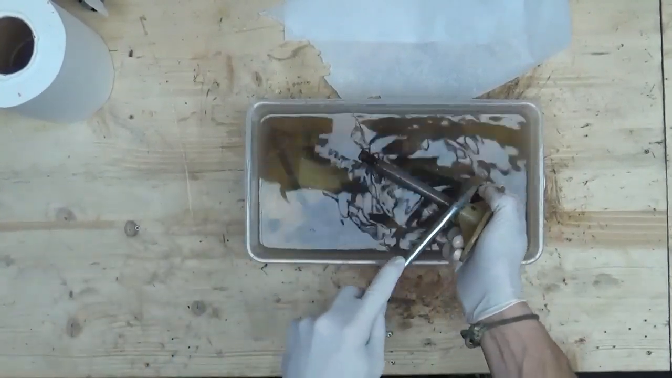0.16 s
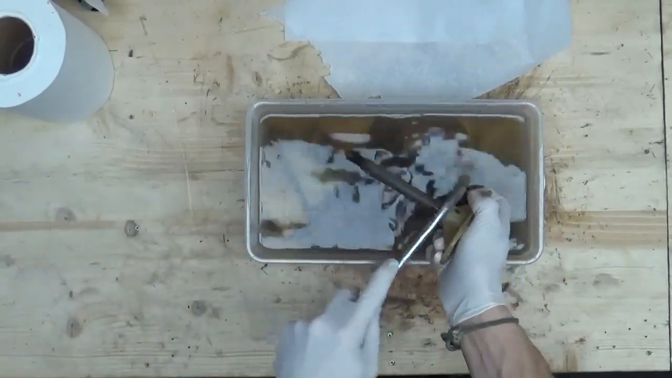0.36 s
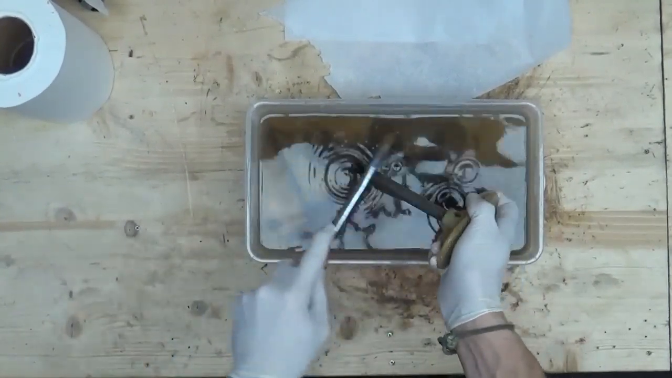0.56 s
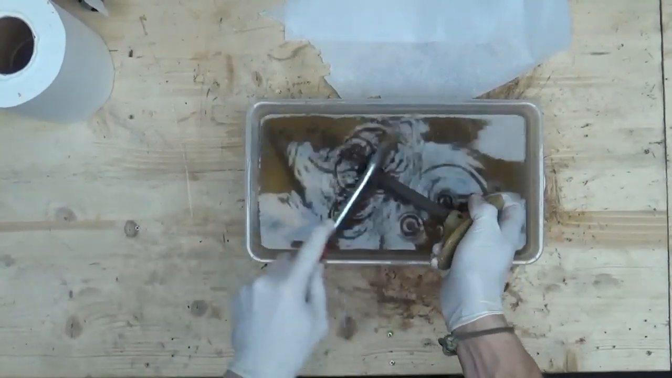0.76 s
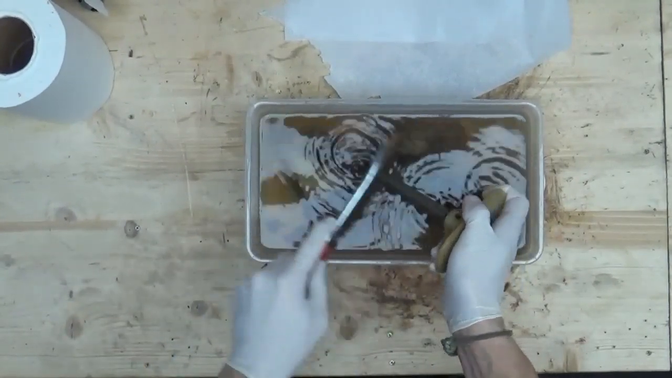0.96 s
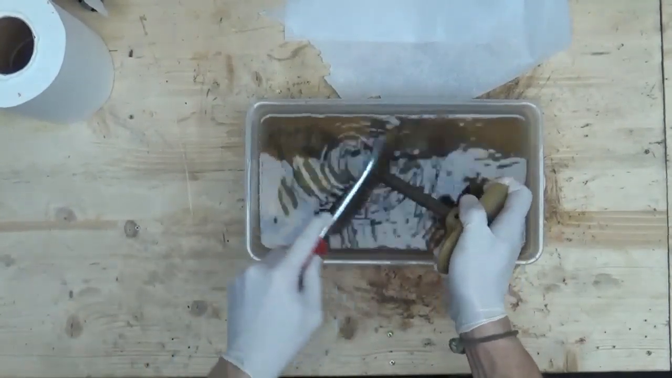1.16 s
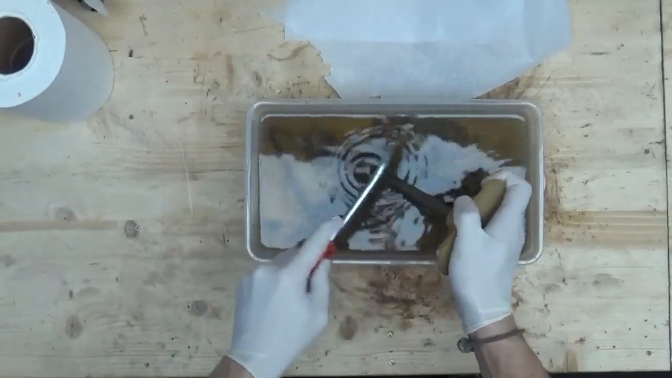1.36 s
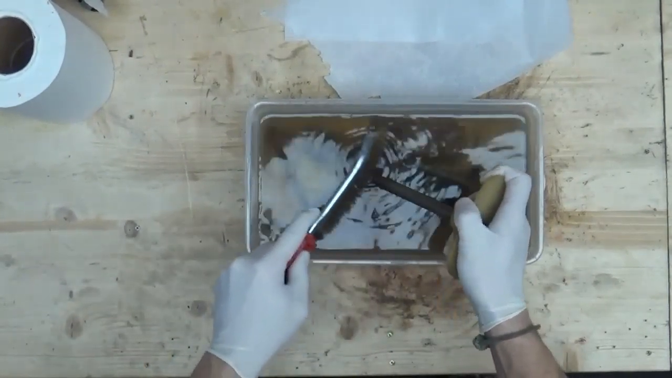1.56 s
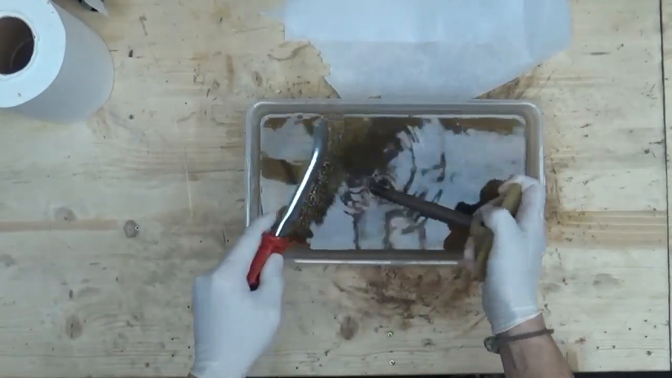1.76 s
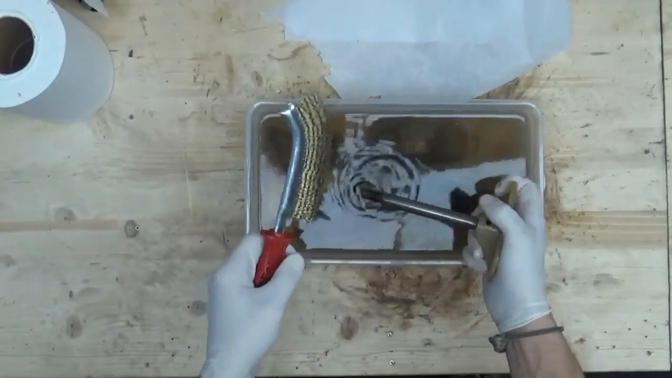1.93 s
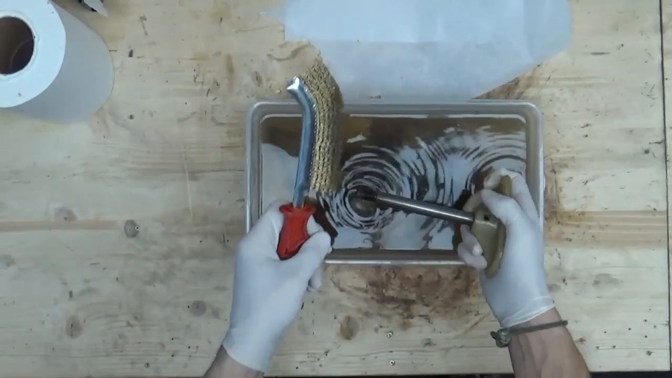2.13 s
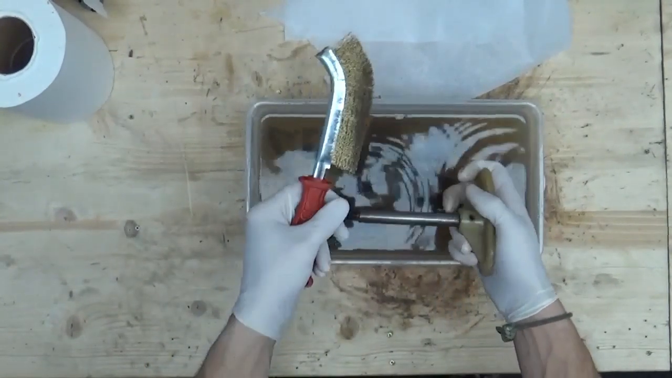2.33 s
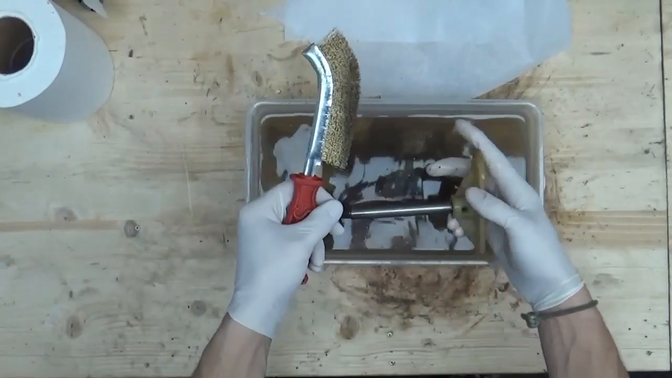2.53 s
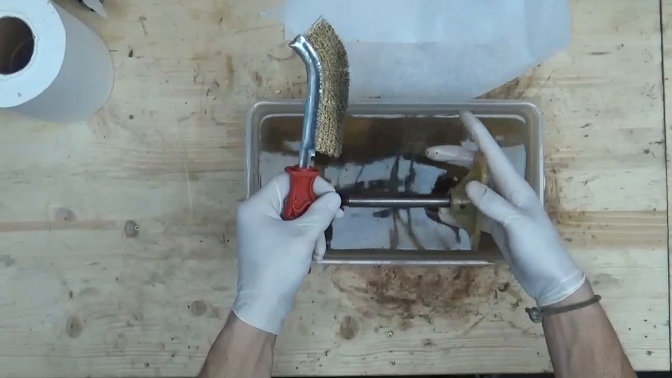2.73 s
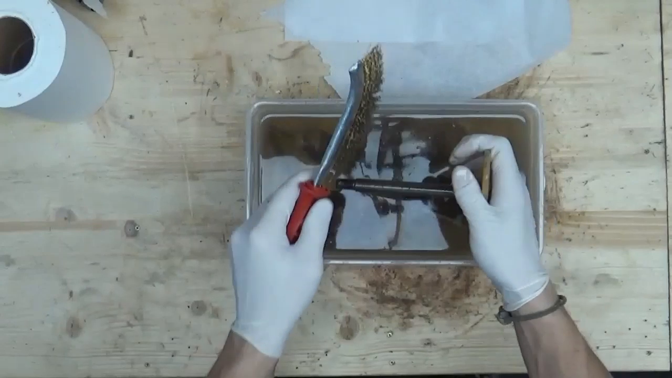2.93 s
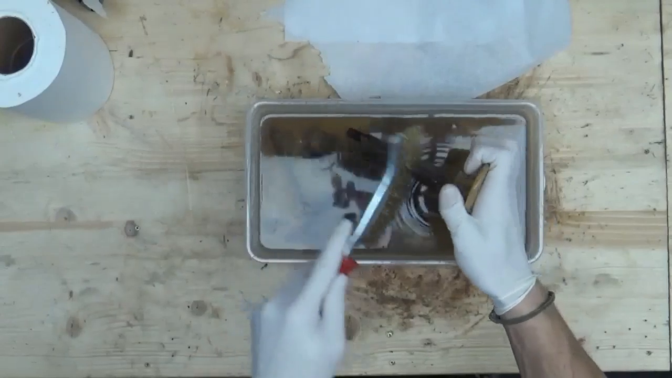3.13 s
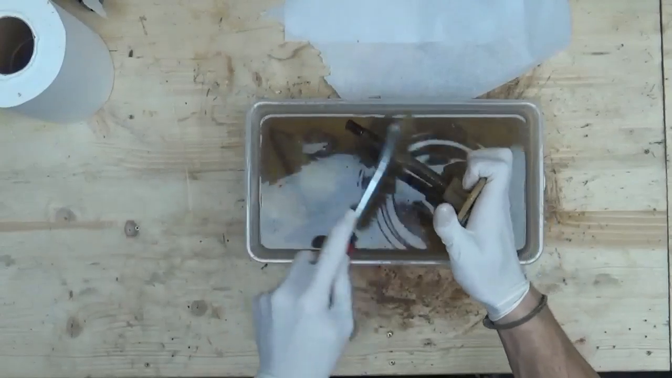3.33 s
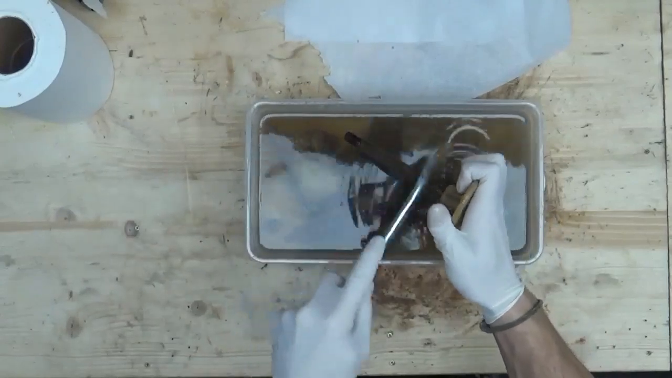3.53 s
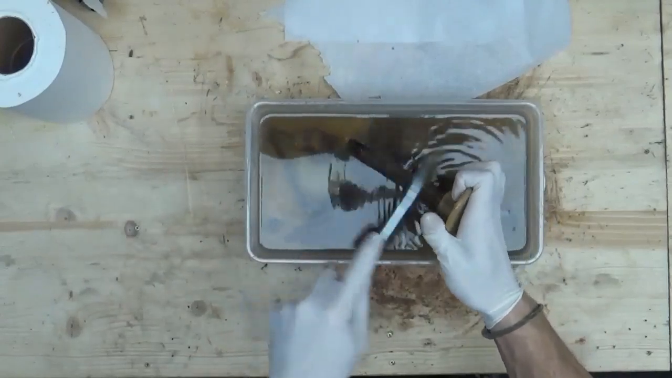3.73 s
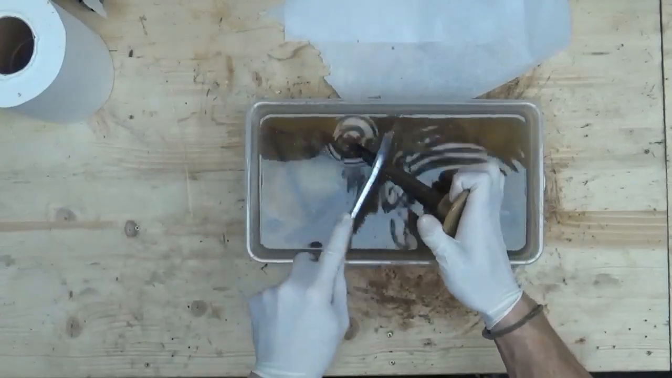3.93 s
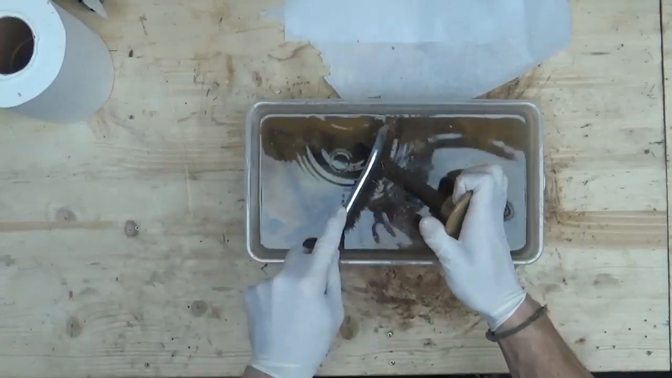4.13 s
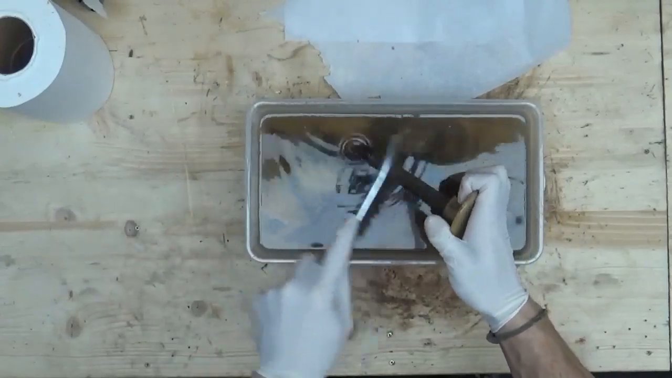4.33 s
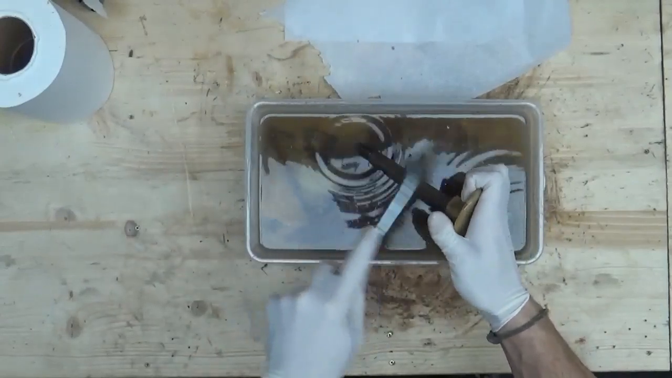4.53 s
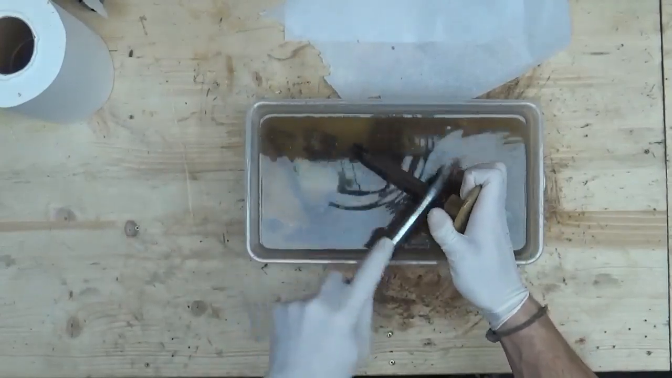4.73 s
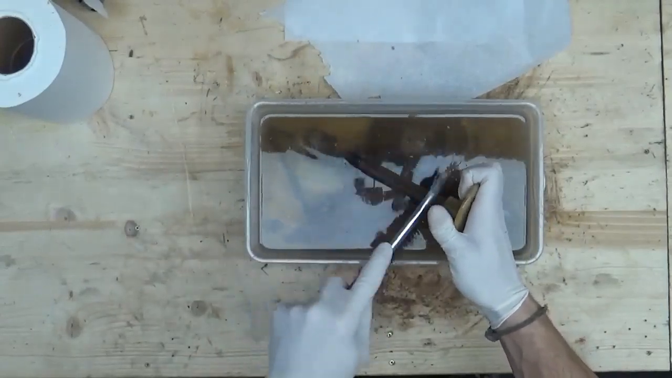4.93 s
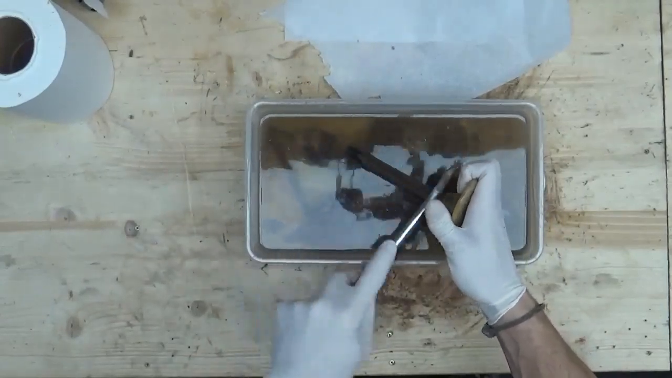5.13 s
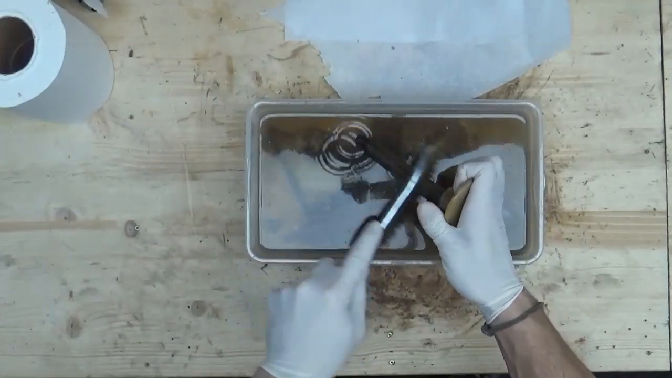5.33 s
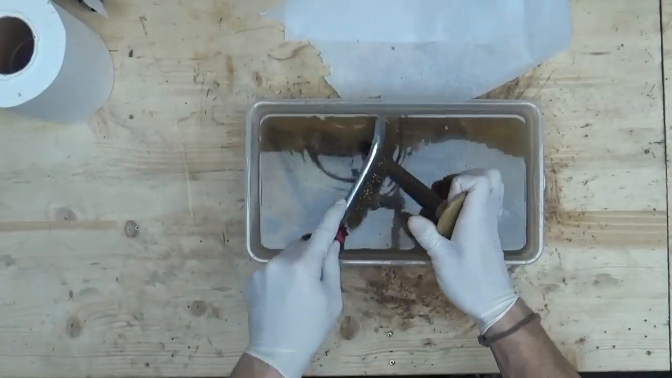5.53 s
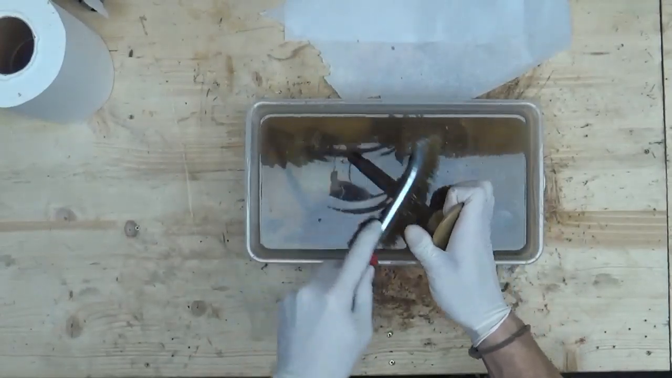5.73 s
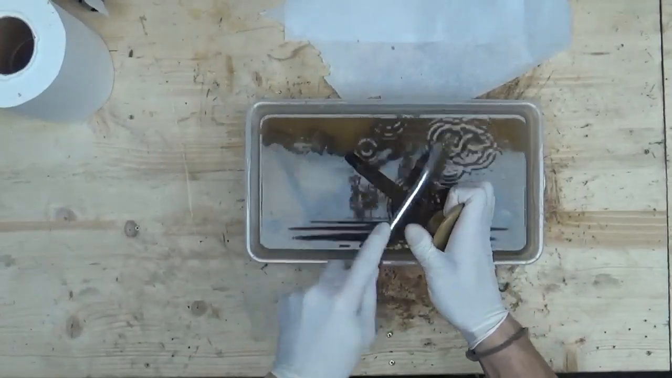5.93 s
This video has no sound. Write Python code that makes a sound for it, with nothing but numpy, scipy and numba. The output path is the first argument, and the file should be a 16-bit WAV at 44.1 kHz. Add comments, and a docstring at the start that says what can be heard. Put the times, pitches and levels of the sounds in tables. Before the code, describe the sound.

A wire brush scrubs a wet metal part in quick, hissy strokes over a tray of liquid, pausing once, with a knock near the end.

```python
"""At a wooden bench in a small, humming room, a wire brush scrubs a wet steel part over a plastic tray.
The strokes are quick, with one pause. By stick-slip friction thousands of bristles catch, let go and
twang, and their rubbing faintly excites the modes of the part. Liquid sloshes below; in the pause,
gloves rustle and drips fall. The back of the brush taps the part, and the part knocks the tray."""
import sys
import numpy as np
from scipy import signal
from scipy.fft import rfft, irfft
from scipy.io import wavfile
from scipy.ndimage import uniform_filter1d
from numba import njit

SR = 44100
rng = np.random.default_rng(int(sys.argv[2]) if len(sys.argv) > 2 else 0)


def digitize_waveform(pressure):
    """Quantize a signal to 16-bit integers and store it at the path in sys.argv[1].

    Rows of a 2-D input are taken as channels; values are limited to [-1, 1].
    """
    field = np.atleast_2d(pressure).T
    bounded = np.clip(field, -1, 1)
    quanta = np.round(bounded * 32767).astype(np.int16)
    wavfile.write(sys.argv[1], SR, quanta)


N = 263433
TIME = np.arange(N) / SR


def undb(db):
    return 10 ** (np.asarray(db) / 20)

def samples(seconds):
    return (seconds * SR).astype(np.int64)

def contour_db(points):
    """Linear interpolation of (time_s, level_db) points, silent outside them."""
    return np.interp(TIME, *np.transpose(points), left=-120, right=-120)

def butterworth(x, order, hz, kind):
    return signal.sosfilt(signal.butter(order, hz, kind, fs=SR, output="sos"), x)

def resonance(x, hz, width_hz):
    """A second-order resonator with unit gain at its centre."""
    return signal.lfilter(*signal.iirpeak(hz, hz / width_hz, fs=SR), x)

def waver(rate_hz):
    """Slow random modulation: steps smoothed twice, with a spread near 1."""
    hold = int(SR / rate_hz)
    steps = np.repeat(rng.standard_normal(N // hold + 1), hold)
    return 1.17 * uniform_filter1d(uniform_filter1d(steps, hold), hold)[:N]

def coloured_noise(hz, db):
    """Spectral shaping of white noise along a logarithmic frequency axis."""
    bins_hz = np.maximum(np.arange(N // 2 + 1) * SR / N, 1)
    gain = undb(np.interp(np.log(bins_hz), np.log(hz), db))
    return irfft(rfft(rng.standard_normal(N)) * gain, N)

def linger(power, decay_s):
    """Exponential relaxation: power dies away after its cause."""
    keep = np.exp(-1 / (decay_s * SR))
    return signal.lfilter([1 - keep], [1, -keep], power)

@njit
def twangs(start, hz, decay_s, peak):
    """Damped oscillations: each swells and dies as t exp(-t / tau) at its own pitch."""
    out = np.zeros(N)
    for k in range(len(start)):
        tau = decay_s[k] * SR
        pole = np.exp(2j * np.pi * hz[k] / SR - 1 / tau)
        phasor = np.e * peak[k] / tau + 0j
        for i in range(min(int(8 * tau), N - start[k])):
            out[start[k] + i] += i * phasor.imag
            phasor *= pole
    return out

def crowd(strength, centre_hz, spread_hz, decay_s, scatter_db, count):
    """Incoherent superposition: randomly timed twangs add in power, their rms following strength."""
    when, chance = rng.random((count, 2)).T
    start = (when * N).astype(np.int64)
    hz = np.broadcast_to(centre_hz, N)[start] + spread_hz * rng.standard_normal(count)
    size = undb(-scatter_db * np.log(np.maximum(chance, .02)))
    rms = np.e * np.sqrt(np.sum(size ** 2) * decay_s * SR / 8 / N)
    return twangs(start, np.clip(hz, 500, 16000), np.full(count, decay_s), size * strength[start] / rms)


# Partials of mains and motor: pitch_hz, rms_db, waver_db
HUM_PARTIALS = [(50.5, -64, -2.5), (90, -66.5, 5), (149.3, -66.5, 0.5), (245, -78, 3)]

def hum():
    """Forced vibration: mains and motor sound low tones that waver in amplitude and phase."""
    out = np.zeros(N)
    for hz, rms_db, waver_db in HUM_PARTIALS:
        amplitude = np.sqrt(2) * undb(rms_db + waver_db * waver(11))
        out += amplitude * np.sin(2 * np.pi * hz * TIME + 0.25 * waver(6.5))
    return out

# Spectrum of the room's air: frequency_hz, relative_density_db
AIR_SPECTRUM = [(15, -37), (25, 8.5), (75, -3), (254, -8), (381, -9.5), (433, -10), (1900, -19),
                (3770, -20), (6440, -30.5), (9200, -22.5), (11000, -25.5), (14300, -61), (22000, -120)]
# Its stereo width: frequency_hz, side_over_mid_db
AIR_WIDTH = [(30, -23), (300, -5), (1500, 2.5), (4000, -3.5), (11000, -6)]
# Its slow swell: time_s, level_db
AIR_SWELL = [(0, -54.5), (1, -56.5), (1.3, -54), (1.95, -57), (2.9, -59.5), (3.33, -60.5), (3.8, -60),
             (4.44, -57), (5.7, -56.5)]

def air():
    """Partly coherent noise: a mid signal is common to both channels, a side signal opposite in sign."""
    hz, db = np.transpose(AIR_SPECTRUM)
    side_hz, side_db = np.transpose(AIR_WIDTH)
    mid = coloured_noise(hz, db)
    side = coloured_noise(hz, db + np.interp(np.log(hz), np.log(side_hz), side_db))
    gain = undb(np.interp(TIME, *np.transpose(AIR_SWELL)) + 0.6 * waver(5.46)) / np.std(mid)
    return gain * np.array([mid + side, mid - side])

# Liquid stirred in the tray, one list a spell: time_s, level_db
SLOSH_SPELLS = [
    [(0, -61.5), (.2, -59.5), (.4, -78), (.9, -64), (1.05, -55), (1.4, -58.5), (1.6, -59), (1.78, -68),
     (1.95, -92)],
    [(3.2, -65), (3.29, -71), (3.45, -68), (4.3, -82), (4.9, -91), (5.4, -70), (5.7, -74)],
]

def slosh():
    """Cavity resonance: the hollow of the tray rings along with bursting bubbles and wavelets."""
    level = sum(undb(contour_db(spell)) for spell in SLOSH_SPELLS)
    bubbles = crowd(level, 1089, 310, decay_s=0.0021, scatter_db=3.4, count=9000)
    return bubbles + undb(4) * resonance(bubbles, 1324, width_hz=38)

# Strokes of the hand, their length running from the bite of the wires to halfway down the fall:
# bite_s, rise_s, length_s, first_db, last_db, snap_db
HAND_STROKES = [(.002, 0.0051, 0.089, -36.5, -45, -58), (0.112, .013, 0.15, -39.5, -24.5, -50),
                (0.311, 0.034, 0.08, -27, -47, -55), (.422, 0.058, 0.092, -25.5, -27.5, -60),
                (0.567, 0.068, 0.07, -25, -26, -20), (.686, 0.028, 0.067, -24, -27, -23),
                (0.81, 0.041, 0.068, -26.5, -27, -22.5), (.91, 0.017, 0.061, -24.5, -25.5, -32),
                (1.007, 0.02, 0.056, -28.5, -28, -38), (1.108, 0.026, 0.047, -26, -23.5, -34.5),
                (1.2048, 0.032, .039, -25, -25.5, -33), (1.281, .004, 0.057, -35, -25.5, -32),
                (1.409, 0.075, 0.021, -26.5, -27, -21), (1.5333, 0.15, 0.054, -28.5, -23.5, -19),
                (3.1982, .006, 0.036, -44, -44.5, -41), (3.273, 0.038, .13, -32, -30, -36.5),
                (3.45, 0.031, 0.084, -33.5, -29, -55), (3.584, 0.048, .071, -31.5, -27, -50),
                (3.716, 0.053, 0.063, -27, -31.5, -55), (3.835, 0.036, 0.072, -28, -28, -48),
                (3.961, 0.023, .066, -29, -30, -41), (4.077, 0.043, 0.06, -28.5, -26.5, -44.5),
                (4.19, .03, 0.063, -27, -24.5, -49), (4.307, 0.029, 0.061, -25.5, -27.5, -34),
                (4.417, 0.034, 0.073, -27.5, -28, -37), (4.533, 0.029, 0.065, -29, -27.5, -29),
                (4.648, 0.038, 0.066, -26, -24, -26), (4.762, 0.016, 0.064, -23, -29, -29),
                (4.871, 0.029, 0.067, -27.5, -27, -39.5), (4.982, 0.026, 0.065, -24, -29.5, -40.5),
                (5.082, 0.022, 0.069, -26.5, -26.5, -41.5), (5.195, .023, 0.065, -27.5, -26.5, -32),
                (5.301, 0.025, 0.067, -29, -27.5, -50), (5.416, 0.03, 0.067, -26, -30, -37),
                (5.531, 0.05, 0.033, -39, -38.5, -55), (5.693, .004, 0.13, -42, -22, -36.5),
                (5.892, 0.06, 0.058, -32, -29, -52)]
TWANG_HZ, GLIDE_HZ, STROKE_SCATTER_HZ = 5281, 283, 80  # the lower family of wire twangs

def strokes():
    """Friction drive: pressure rises, holds and falls; the twang climbs on a push, sinks on a pull."""
    lead = 0.73  # share of the rise that precedes the bite
    power, lower_hz = np.zeros(N), np.full(N, float(TWANG_HZ))
    scatter_hz = STROKE_SCATTER_HZ * rng.standard_normal((len(HAND_STROKES), 2))
    for k, (bite_s, rise_s, length_s, first_db, last_db, _) in enumerate(HAND_STROKES):
        fall_s = 0.015 + 0.31 * length_s  # a longer stroke lets go more slowly
        hold_s = length_s - fall_s / 2
        start = max(int((bite_s - lead * rise_s) * SR), 0)
        t = TIME[start:int((bite_s + hold_s + fall_s) * SR)] - bite_s
        level = undb(np.interp(t, [0, hold_s], [first_db, last_db]))
        rise = np.sin(np.pi / 2 * np.clip(t / rise_s + lead, 0, 1)) ** 2
        fall = np.sin(np.pi / 2 * np.clip(1 - (t - hold_s) / fall_s, 0, 1)) ** 2
        power[start:start + len(t)] += (level * rise * fall) ** 2
        glide_hz = scatter_hz[k] + (-1) ** k * GLIDE_HZ * np.array([1, -1])
        lower_hz[start:] = TWANG_HZ + np.interp(TIME[start:] - bite_s, [0, length_s], glide_hz)
    power += undb(-9.5) ** 2 * linger(power, decay_s=0.022)  # bent wires keep springing back
    return np.sqrt(power), lower_hz

# Modes of the back of the brush: pitch_hz, width_hz, relative_db
BRUSH_MODES = [(4820, 41, 3), (5320, 13, -18), (5900, 16, -22), (7070, 62, 5), (7340, 20, 6.5),
               (8230, 68, -1), (9100, 25, -20), (9380, 410, -9), (9550, 32, 0.5)]

def bristles(grip, lower_hz, upper_db):
    """Stick-slip: released wires twang in two main families and excite the back of the brush."""
    lower = undb(-2.5) * grip / np.sqrt(1 + undb(upper_db) ** 2)
    upper = lower * undb(upper_db)
    lower_hz = lower_hz + 120 * waver(30)  # the free length of the wires changes as they bend
    slips = crowd(lower, (lower_hz + TWANG_HZ) / 2, 640, decay_s=0.00028, scatter_db=1.2, count=30000)
    slips += crowd(upper, 9480, 917, decay_s=0.00038, scatter_db=0.83, count=40000)
    slips += crowd(undb(-8.5) * upper, 7160, 1010, decay_s=0.00052, scatter_db=1, count=20000)
    singing = crowd(undb(-3) * lower, lower_hz + 149.5, 210, decay_s=0.0035, scatter_db=3.2, count=2500)
    singing += crowd(undb(-12) * upper, 8900, 1130, decay_s=0.0044, scatter_db=4.4, count=2500)
    wires = butterworth(slips + singing, 8, 4000, "high")  # no wire is long enough to sound lower
    back = sum(undb(db) * resonance(wires, hz, width) for hz, width, db in BRUSH_MODES)
    return wires + undb(-6) * back

# Modes of the steel part: pitch_hz, width_hz, relative_db
STEEL_MODES = [(1550, 19, -17.5), (2134, 126, -16), (2278, 60, -12.5), (2720, 35, -14.5),
               (1650, 230, -34.5), (2510, 486, -18), (3100, 650, -20)]

def steel_part(drive, sing_db):
    """Modal response to friction noise: each mode comes and goes as the brush wanders along the part."""
    scrape = uniform_filter1d(drive, size=1700) * rng.standard_normal(N)
    singing = resonance(scrape * undb(sing_db + 3.1 * waver(13)), 1890, width_hz=65)
    modes = sum(resonance(scrape * undb(db + 3.1 * waver(24.59)), hz, width)
                for hz, width, db in STEEL_MODES)
    return undb(19) * (modes + undb(-8) * singing)

# Effect of the brush's angle and place: time_s, upper_over_lower_db, part_drive_db, singing_mode_db
BRUSH_CONTACT = [(0, 3, -13, 1), (.2, 5, -17, 1.5), (.45, 3.5, -15, 1), (.8, 1.5, -14, -1),
                 (1.15, 2.5, -15, 0), (1.4, 2.5, -10.5, -3.5), (1.6, 6, -16.5, 6.5), (3.2, 1, -10, -15),
                 (3.3, 3, -14.5, -7), (3.6, 0.5, -16, -0.5), (4.1, 1, -17, 1), (4.4, -0.5, -15, 1),
                 (5.1, 0.5, -16, 6.5), (5.55, 2, -17.5, 7), (5.75, 4.5, -9, -9), (5.95, 1.5, -10.5, -1)]

def scrubbing(pressure, lower_hz):
    """Contact coupling: angle and place set how strongly friction drives the wires and the part."""
    time_s, *columns = np.transpose(BRUSH_CONTACT)
    upper_db, part_db, sing_db = (np.interp(TIME, time_s, db) for db in columns)
    grip = pressure * undb(1.6 * waver(90))  # rust patches catch the wires unevenly
    return bristles(grip, lower_hz, upper_db) + steel_part(grip * undb(part_db), sing_db)

def tick(start_s, level_db, lower_db, spread_s):
    """A transient of 40 twangs in two bands: the first crowd together, the rest trail off."""
    lateness, pitch = rng.random((2, 40))
    lateness = lateness ** 2
    is_lower = np.arange(40) % 2 == 1
    hz = np.where(is_lower, 4600 + 1800 * pitch, 7300 + 3600 * pitch)
    decay_s = np.where(is_lower, .00035, .0002)
    peak = undb(level_db - 12 * lateness + is_lower * lower_db)
    return twangs(samples(start_s + spread_s * lateness), hz, decay_s, peak)

# Wires snapping free later in a stroke: start_s, level_db
LATE_SNAPS = [(0.0488, -34), (0.14, -31.5), (.226, -18.5), (0.5423, -35), (1.3294, -22), (1.5463, -30),
              (1.5665, -19), (3.2625, -50)]

def snaps():
    """Sudden elastic release: clusters of wires let go at each bite and sometimes after it."""
    bites = [(stroke[0], stroke[-1]) for stroke in HAND_STROKES]
    out = np.zeros(N)
    for start_s, db in [*bites, *LATE_SNAPS]:
        lower_db = -0.6 * max(db + 42, 0)  # a harder snap is brighter
        out += tick(start_s, db, lower_db, spread_s=.004)
    return out

def wire_ping(start_s=.05, pitch_hz=4330, decay_s=.014):
    """Free vibration: one wire rings on after its snap."""
    t = np.maximum(TIME - start_s, 0)
    return undb(-42) * np.exp(-t / decay_s) * np.sin(2 * np.pi * pitch_hz * t)

# The metal back of the brush striking the part: start_s, peak_db, pitch_hz
BRUSH_TAPS = [(0.425, -35.5, 1890), (1.02, -34.5, 2830), (1.149, -31, 2730), (1.197, -45, 1530),
              (1.328, -38, 1510), (1.409, -42, 1550), (1.531, -41, 2700), (1.558, -34, 2720),
              (3.262, -48, 2860), (3.479, -42, 2760)]

def taps():
    """Impact excitation: each tap sounds one strongly damped mode."""
    start_s, db, hz = np.transpose(BRUSH_TAPS)
    return twangs(samples(start_s), hz, 2.8 / hz, undb(db))

# Faint low tones in the background: start_s, length_s, pitch_hz, peak_db
LOW_TONES = [(1.13, 0.089, 422, -58), (3.302, 0.11, 361, -61), (3.43, 0.0934, 386, -62.5),
             (4.354, 0.1, 294, -59)]

def low_tones():
    """Tone bursts: short sinusoids swell and fade under a rounded envelope."""
    out = np.zeros(N)
    for start_s, length_s, hz, db in LOW_TONES:
        envelope = np.sin(np.pi * np.clip((TIME - start_s) / length_s, 0, 1)) ** .5
        out += undb(db) * envelope * np.sin(2 * np.pi * hz * TIME)
    return out

# Gloves and wet wires while the brush is lifted: time_s, level_db
PAUSE_RUSTLE = [(1.62, -78), (1.8, -57.5), (2.2, -65), (2.45, -64.5), (2.67, -69), (2.76, -64),
                (2.82, -67.5), (2.98, -62.5), (3.19, -69)]
# Gloves ticking as the part is turned: start_s, level_db
GLOVE_SLIPS = [(1.767, -52), (1.9101, -55), (2.6895, -42.5), (2.7434, -47.5), (3.035, -39.5), (3.046, -50)]

def rustle(pressure):
    """Shot noise: tiny transients from gloves and wet wires merge into crackle; a few ticks stand out."""
    level = undb(contour_db(PAUSE_RUSTLE) + 3.5 * waver(12))
    level += undb(-23) * np.sqrt(linger(pressure ** 2, decay_s=0.036))  # wires crackle after a stroke
    ticks = np.zeros(N)
    for start_s, db in GLOVE_SLIPS:
        ticks += tick(start_s, db, lower_db=-33, spread_s=.0015)
        trail = np.exp(-np.abs(TIME - start_s) / 0.016) * (TIME > start_s)
        level += undb(db - 16.5) * trail
    crackle = crowd(level, 9920, 2480, decay_s=0.00027, scatter_db=2.1, count=25000)
    crackle += crowd(undb(-3.5) * level, 4520, 1730, decay_s=0.00022, scatter_db=1.8, count=10000)
    return ticks + crackle

# The clearest drips into the tray: start_s, peak_db, pitch_hz
CLEAR_DRIPS = [(1.7442, -55, 3510), (1.9098, -52, 2880), (2.0031, -53, 2820), (2.486, -50, 3950),
               (3.0447, -52, 4470)]

def drips():
    """Damped oscillation: each drip rings for a few cycles; ten smaller ones fall at random."""
    small = [(rng.uniform(1.75, 3), -61, rng.uniform(1750, 4000)) for _ in range(10)]
    start_s, db, hz = np.transpose([*CLEAR_DRIPS, *small])
    return twangs(samples(start_s), hz, 2 / hz, undb(db))

# The part bumping the tray: start_s, impulse_db, contact_s
TRAY_KNOCKS = [(3.278, -49, 0.00016), (5.7798, -11, 0.00026), (5.806, -41, 0.0013), (5.845, -26.5, 0.00036)]
# Modes of the plastic tray: pitch_hz, relative_db, t60_s
TRAY_MODES = [(175, -8.5, 0.032), (230, -9, 0.096), (384, -14.5, 0.098), (431, -20.5, 0.19),
              (480, -4.5, 0.099), (560, 0, 0.014), (710, -10.5, 0.031), (804, -3.5, 0.034),
              (886, -2.5, 0.032), (1088, -7.5, 0.027), (1311, -8.5, 0.059), (1640, -9, 0.023),
              (2270, -2.5, 0.023), (2650, -9, 0.0067), (3350, -3, 0.013)]

def tray(rattle_hz=900, rattle_t60_s=.3):
    """Impact on a modal body: half-sine pushes ring the tray, longer ones duller; a rattle follows."""
    force = np.zeros(N)
    for start_s, db, contact_s in TRAY_KNOCKS:
        width = int(contact_s * SR)
        i = np.arange(width + 1)
        force[int(start_s * SR) + i] += undb(db) * np.sin(np.pi * i / width) / width
    t = TIME[:SR // 2]
    bounces = rng.standard_normal(len(t)) * (rng.random(len(t)) < .15)
    rattle = butterworth(bounces * 1000 ** (-t / rattle_t60_s), 1, rattle_hz, "low")
    rattle *= np.sqrt(SR / rattle_hz / np.pi)  # restores the power lost in the low-pass
    force += undb(-34) * signal.fftconvolve(force, rattle)[:N]
    ring = sum((-1) ** k * undb(db) * np.sin(2 * np.pi * hz * t) * 1000 ** (-t / t60_s)
               for k, (hz, db, t60_s) in enumerate(TRAY_MODES))
    knocks = signal.fftconvolve(force, ring)[:N]
    return butterworth(knocks, 2, 150, "high")  # a small tray radiates no deep bass

def room(x, t60_s=0.18):
    """Diffuse reverberation: a short midrange tail, different in each channel."""
    t = TIME[:SR // 2]
    tail = rng.standard_normal((2, len(t))) * 1000 ** (-t / t60_s) * (t > .003)
    tail /= np.sqrt(np.sum(tail ** 2, axis=1, keepdims=True))
    tail = butterworth(tail, 1, [636, 6340], "band")
    return undb(-6.5) * signal.fftconvolve(x[None], tail, axes=1)[:, :N]

def scene():
    """Superposition of the direct sound from the bench, its reverberation and the background."""
    pressure, lower_hz = strokes()
    direct = slosh() + scrubbing(pressure, lower_hz) + snaps() + wire_ping() + taps()
    direct += rustle(pressure) + drips() + tray()
    return direct + room(direct) + hum() + air() + low_tones()

def record(dry):
    """Band limiting: the deepest bass rolls off and the top treble is cut steeply."""
    thin = butterworth(dry, 3, 40, "high")
    return signal.sosfilt(signal.ellip(12, .3, 75, 10990, fs=SR, output="sos"), thin)


dry = scene()
out = record(dry)
digitize_waveform(out)
```